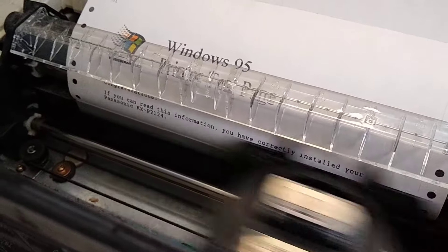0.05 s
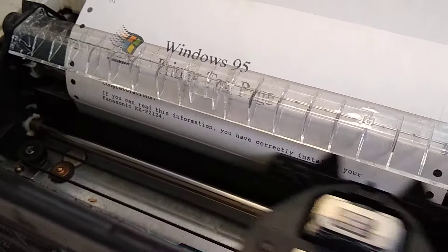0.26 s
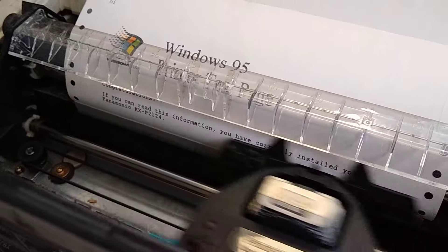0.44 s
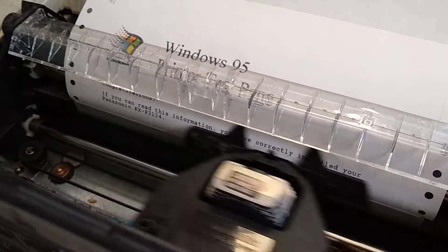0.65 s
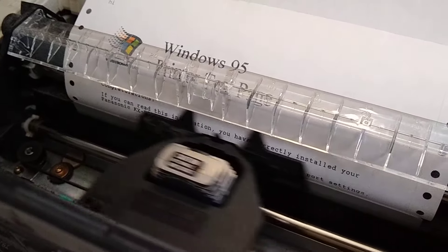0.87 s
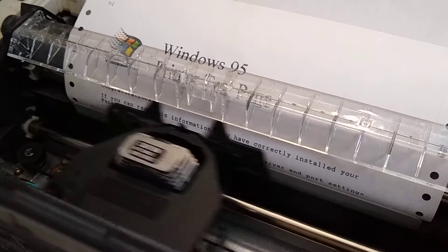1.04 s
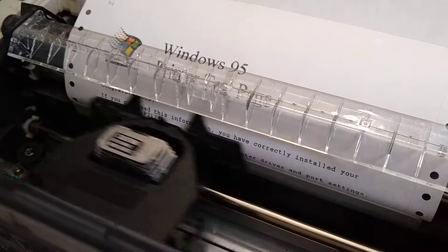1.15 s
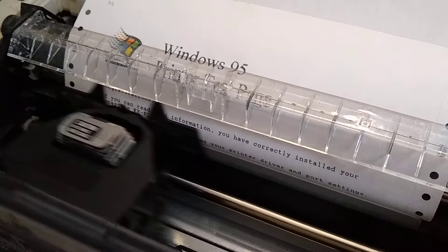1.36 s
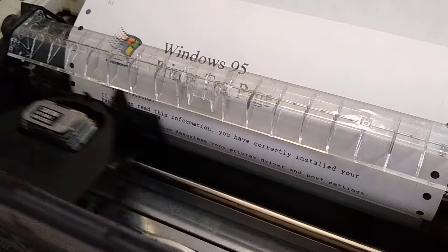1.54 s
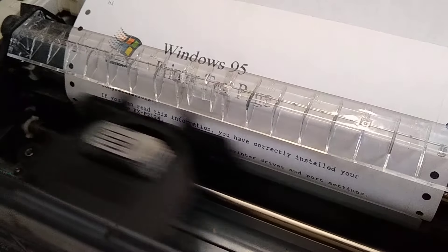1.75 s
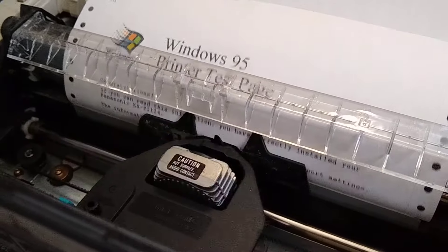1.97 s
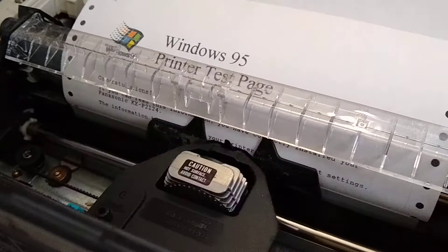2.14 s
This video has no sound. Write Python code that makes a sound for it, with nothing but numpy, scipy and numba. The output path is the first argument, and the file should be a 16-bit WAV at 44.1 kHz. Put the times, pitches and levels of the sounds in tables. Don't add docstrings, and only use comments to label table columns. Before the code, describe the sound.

Dot matrix printer head buzzing raspily across one line, carriage whirring and clacking, close up indoors.

```python
import sys
import numpy as np
from scipy import signal
from scipy.fft import rfft, irfft
from scipy.io import wavfile
from scipy.ndimage import uniform_filter1d
from numba import njit

SR = 44100
rng = np.random.default_rng(int(sys.argv[2]) if len(sys.argv) > 2 else 0)


def transcribe(signal):
    frames = np.atleast_2d(signal).T
    limited = np.clip(frames, -1, 1)
    pcm = np.round(limited * 32767).astype(np.int16)
    wavfile.write(sys.argv[1], SR, pcm)


def decibels_to_gain(level_db):
    exponent = np.asarray(level_db, float) / 20
    return 10 ** exponent


N = 97020
T = np.arange(N) / SR
FREQ = np.fft.rfftfreq(2 ** 17, 1 / SR)


def unit(x):
    return x / np.sqrt(np.mean(x ** 2))


def curve(table, col=1):
    table = np.array(table)
    return np.interp(T, table[:, 0], table[:, col])


def over_hz(table, f=FREQ):
    table = np.array(table)
    return np.interp(np.log(f + 1), np.log(table[:, 0]), table[:, 1])


def through(x, response):
    size = 2 * (len(FREQ) - 1)
    return irfft(rfft(x, size) * response, size)[:N]


def colour(table):
    cepstrum = irfft(np.log(decibels_to_gain(over_hz(table))))
    half = len(cepstrum) // 2
    cepstrum[1:half] *= 2
    cepstrum[half + 1:] = 0
    return np.exp(rfft(cepstrum))


def coloured_noise(response):
    return unit(through(rng.standard_normal(N), response))


def peak(hz, width):
    return 1 / (1 + 1j * (FREQ - hz ** 2 / (FREQ + 1)) / width)


def low_cut(hz):
    return 1 / (1 - 1j * hz / (FREQ + 1)) ** 2


@njit
def svf(x, hz, width):
    y, band, low = np.empty(len(x)), 0., 0.
    for i in range(len(x)):
        g, k = np.tan(np.pi * hz[i] / SR), width / hz[i]
        v = (band + g * (x[i] - low)) / (1 + g * (g + k))
        band, low, y[i] = 2 * v - band, low + 2 * g * v, k * v
    return y


def walk(rate):
    k = int(SR / rate)
    held = np.repeat(rng.standard_normal(N // k + 1), k)
    return 1.58 * uniform_filter1d(uniform_filter1d(held, k), k)[:N]


def gate(start, length, edge):
    return np.clip((T - start) / edge, 0, 1) * np.clip((start + length - T) / edge, 0, 1)


# (frequency [Hz], density [dB/Hz])
ROOM_SPECTRUM = [(24, -47), (40, -17), (164, 8), (866, 1), (1260, -22), (2710, -8), (15000, -13)]


def room():
    return [coloured_noise(colour(ROOM_SPECTRUM)) * decibels_to_gain(-75) for _ in range(2)]


# (time [s], level [dB])
RUMBLE_LEVEL = [(.35, -69), (.9, -55.5), (1.2, -62.5), (1.5, -50.5), (1.72, -49), (1.78, -85)]
POWER_ON_S = .055


def rumble():
    drone = coloured_noise(peak(230, 66) ** 2) * decibels_to_gain(-57) * gate(0.43, 1.54, .05)
    low = coloured_noise(peak(141.3, 17) ** 2) * decibels_to_gain(curve(RUMBLE_LEVEL))
    return drone + low * (T > POWER_ON_S)


# (multiple of the motor rate [-], level [dB])
FEED_TONES = [(1, -51.5), (2, -56.5), (3, -56), (5, -61)]
# (frequency [Hz], density [dB/Hz])
FRICTION_SPECTRUM = [(200, -11.5), (700, -8.5), (2500, -0.5), (5000, -8.5), (7000, -16.5), (11000, -13.5),
                     (16000, -23)]
FEED_S, FEED_LENGTH_S, FEED_HZ = 2.04, 0.16, 405


def feed():
    hum = 0
    for k, db in FEED_TONES:
        hum = hum + decibels_to_gain(db + 3.3 * walk(28.68)) * np.sin(2 * np.pi * k * FEED_HZ * T)
    rustle = coloured_noise(colour(FRICTION_SPECTRUM)) * decibels_to_gain(-44 + 2.3 * walk(40.05))
    hum = 1.5 * hum * gate(FEED_S + 0.04, FEED_LENGTH_S - .05, 0.015)
    return hum + rustle * gate(FEED_S, FEED_LENGTH_S, .025)


# (time [s], frequency [Hz], level [dB], decay time T60 [s])
SHUDDERS = [
    (0.067, 297, -44.5, 0.29),
    (0.065, 1840, -43, .06),
    (0.322, 272, -46, 0.13),
    (1.778, 296, -36.5, 0.24),
    (2.036, 249, -44, 0.23),
    (2.179, 240, -44.5, 0.15),
]
# (time [s], frequency [Hz], level [dB], decay time T60 [s])
RINGS = [(.353, 1090, -37, .045), (.36, 1200, -37, .04), (.392, 2600, -33, .035), (.396, 2480, -35, .03),
         (.404, 2620, -34, .03), (.408, 2400, -34, .03), (1.737, 1120, -41, .05), (1.75, 780, -41, .06),
         (1.77, 620, -36, .04), (1.7995, 4060, -20, .02), (1.7995, 2100, -32, .025),
         (1.905, 2150, -24, .018), (1.905, 3300, -27, .018), (2.025, 1100, -45, .06),
         (2.137, 1150, -35, .03), (2.137, 2080, -37, .03)]
# (time [s], level [dB], centre frequency [Hz], bandwidth [Hz])
KNOCKS = [(.057, -37, 1100, 1500), (.312, -25, 1500, 1600), (1.745, -30, 700, 900), (1.77, -30, 1200, 2500),
          (1.779, -25, 3000, 5000), (.238, -26, 3500, 4000), (1.8, -22, 5000, 5000),
          (1.865, -23, 3000, 3000), (1.892, -24, 4800, 1500), (1.906, -21, 4500, 3000),
          (2.137, -26, 1800, 3000), (2.179, -32, 4000, 4000)]
MODE_RISE_S, KNOCK_T60_S, KNOCK_TICK = .001, .018, 1.2


def jolts():
    out = np.zeros(N)
    for s, hz, db, t60 in [*SHUDDERS, *RINGS]:
        t = np.clip(T - s, 0, None)
        envelope = decibels_to_gain(db - 60 * t / t60) * 2 * (1 - np.exp(-t / MODE_RISE_S))
        out += envelope * np.sin(2 * np.pi * hz * t)
    for s, db, hz, width in KNOCKS:
        envelope = (T >= s) * decibels_to_gain(db - 60 * np.abs(T - s) / KNOCK_T60_S)
        burst = envelope * (rng.standard_normal(N) + KNOCK_TICK * (T < s + .0001))
        out += 2 * svf(burst, np.full(N, 1. * hz), 1. * width)
    return out


# (time [s], duration [s], level [dB])
SQUEALS = [
    (1.66, .06, -50),
    (1.715, .065, -44),
    (2.0, .045, -46),
    (.36, .05, -54),
]
SQUEAL_HZ, SQUEAL_WIDTH_HZ = 4220, 240.


def squeal():
    hz = SQUEAL_HZ * (1 + .025 * walk(66))
    tone = svf(svf(rng.standard_normal(N), hz, SQUEAL_WIDTH_HZ), hz, SQUEAL_WIDTH_HZ)
    return unit(tone) * sum(decibels_to_gain(db) * gate(s, length, 0.0084) for s, length, db in SQUEALS)


# (time [s], duration [s], level [dB])
WHINES = [
    (0.036, 0.021, -50.5),
]
# (multiple of the whine frequency [-], level [dB])
WHINE_TONES = [(1, -26), (2, -14), (3, 0), (4, -20), (5, -10), (6, -14), (7, -12), (8, -20)]
WHINE_HZ = 1443


def whine():
    wobble = walk(100)
    tone = 0.24 * rng.standard_normal(N)
    for k, db in WHINE_TONES:
        tone = tone + decibels_to_gain(db) * np.sin(2 * np.pi * k * WHINE_HZ * T + k * k + 0.22 * k * wobble)
    return tone * sum(decibels_to_gain(db) * gate(s, length, 0.0011) for s, length, db in WHINES)


# (time [s], speed as a share of printing speed [-])
SPEED = [(.055, 0), (.06, .75), (.092, 1.5), (.292, 1.5), (.328, .3), (.338, .1), (.345, .6), (.372, 1),
         (1.732, 1), (1.76, .35), (1.768, .35), (1.776, 1.15), (1.8, 1.5), (2.015, 1.5), (2.043, .3),
         (2.056, 0)]
# (multiple of the step rate [-], level printing [dB], level dashing [dB])
MOTOR = [(1, -53, -66), (2, -59, -62), (3, -70, -70), (4, -45, -66), (5, -68, -53), (6, -59, -64),
         (7, -68, -46), (8, -66, -53), (10, -66, -56), (12, -56, -57)]
# (time [s], gain [dB])
STEP_HUM = [(0, 1.5), (.62, 0.5), (.7, -4.5), (1.4, -7), (1.6, -3.5), (2.2, 0)]
# (multiple of the belt rate [-], level dashing [dB])
BELT = [(1, -59), (2, -58), (3, -57)]
# (frequency [Hz], density [dB/Hz])
RAIL_SPECTRUM = [(200, -20), (330, -8.5), (460, -24.5), (1500, -16.5), (2600, 5), (7000, -2), (12000, 1.5),
                 (16000, -14.5)]
STEP_HZ, BELT_HZ = 337.7, 241.5
GLIDE_LOSS_DB = 1.3
RAIL_DB, RAIL_POWER, RAIL_GRAIN_DB = -25.5, 2.17, 2.5


def carriage():
    v = curve(SPEED)
    turn = 2 * np.pi * np.cumsum(v) / SR
    dash, moving = np.clip(2 * v - 2, 0, 1), np.clip(2.3 * v, 0, 1)
    gliding = np.clip(uniform_filter1d(np.abs(np.gradient(v)) * SR / 15, size=400), 0, 1)
    tones = np.zeros(N)
    for k, slow_db, fast_db in MOTOR:
        db = slow_db + (fast_db - slow_db) * dash + (k == 1) * curve(STEP_HUM)
        db = db + 0.36 * walk(24.6) - GLIDE_LOSS_DB * k * gliding
        tones += decibels_to_gain(db) * np.sin(k * STEP_HZ * turn + k * k)
    for k, db in BELT:
        tones += decibels_to_gain(db + 1.9 * walk(14.4)) * dash * np.sin(k * BELT_HZ * turn)
    roughness = 6.3 * uniform_filter1d(rng.standard_normal(N), size=40)
    grains = rng.standard_normal(N) * decibels_to_gain(RAIL_GRAIN_DB * roughness)
    hiss = unit(through(grains, colour(RAIL_SPECTRUM))) * decibels_to_gain(RAIL_DB + .5 * walk(44.14))
    hiss = hiss * (v / 1.675) ** RAIL_POWER
    slide = coloured_noise(colour(FRICTION_SPECTRUM)) * decibels_to_gain(-38.5 + 2 * walk(50.0))
    return (1.8 * tones + slide) * moving + hiss


WORDS = [(0, 9), (10, 4), (15, 3), (19, 6), (26, 7), (34, 4), (39, 9), (49, 5), (55, 11), (67, 3)]
INK = [(0, .05), (.2, .12), (.3, .32), (.45, .25), (.62, .3), (.8, .18), (1, .08)]
# (time [s], strength [dB])
STROKES = [(0.4214, -60), (0.4387, -2.5), (0.5101, -47), (0.5282, -0.5), (0.6007, -28), (0.626, -14),
           (0.6516, -8), (0.6797, 8), (0.7232, -4), (0.7585, -69), (0.774, -42), (0.8806, -13),
           (0.9182, -3.5), (0.974, -7.5), (0.992, -11), (1.0236, -1.5), (1.1078, -5.5), (1.2848, -7.5),
           (1.3236, -5), (1.3915, -4), (1.4575, -9.5), (1.5417, -20), (1.611, -37)]
LETTER_HZ, LINE_START_S, COLUMNS, PINS = 56.262, .4148, 36, 24
DOT = (.25, .7)
STROKE_DB, STROKE_S = -5.5, 0.00114
LETTER_SCATTER_DB, COLUMN_SCATTER_DB, PIN_SCATTER_DB = .7, 2.8, 2.5
PIN_JITTER_S, ROW_LAG = .000032, .46
REBOUND_S, REBOUND_JITTER_S, REBOUND_DB = .0011, 0.0003063, 1.5
FLEX_SCATTER = .4
FLEX_FROM, FLEX_TOP = .14, .4


def impulses(times, sizes):
    fine = 8
    train = np.bincount((times * SR * fine).astype(int), sizes, N * fine)
    return signal.resample_poly(train, 1, fine)


def strikes():
    letters = np.concatenate([np.arange(first, first + n) for first, n in WORDS])
    place = np.arange(COLUMNS) / COLUMNS
    when = (LINE_START_S + (letters[:, None] + place) / LETTER_HZ).ravel()
    letter_gain = decibels_to_gain(LETTER_SCATTER_DB * rng.standard_normal((len(letters), 1)))
    share = np.interp(place, *np.array(INK).T) * letter_gain
    share[0] *= (place > DOT[0]) & (place < DOT[1])
    even = share.ravel()
    share = even * decibels_to_gain(COLUMN_SCATTER_DB * rng.standard_normal(len(when)))
    for s, db in STROKES:
        share = share + decibels_to_gain(db + STROKE_DB) * np.exp(-((when - s - STROKE_S) / STROKE_S) ** 2)
    size = np.clip((share[:, None] - rng.random((len(when), PINS))) * 20, 0, 1)
    z = rng.standard_normal((4, len(when), PINS))
    row_lag = np.arange(PINS) % 2 * ROW_LAG / (LETTER_HZ * COLUMNS)
    hit = when[:, None] + row_lag + PIN_JITTER_S * z[0]
    rebound = hit + REBOUND_S + REBOUND_JITTER_S * z[1]
    hit_size = size * decibels_to_gain(PIN_SCATTER_DB * z[2])
    rebound_size = -size * decibels_to_gain(REBOUND_DB + PIN_SCATTER_DB * z[3])
    times = np.concatenate([hit, rebound]).ravel()
    sizes = np.concatenate([hit_size, rebound_size]).ravel()
    push = np.clip(even + FLEX_SCATTER * (share - even) - FLEX_FROM, 0, FLEX_TOP)
    return impulses(times, sizes), impulses(when, push)


# (time [s], level [dB], ring centre [Hz], ring level [dB], platen flex level [dB])
HEAD = [(.42, -12, 9830, 10, -5), (.7, -11, 9840, 12.5, -12), (.95, -10, 9810, 10, -6),
        (1.2, -10, 10160, 6.5, -5.5), (1.45, -10.5, 10240, 2, -4), (1.66, -10.5, 10100, 3, -8)]
# (frequency [Hz], density [dB/Hz])
PLATEN_SPECTRUM = [(500, -30), (900, -5.5), (1800, -5.5), (2300, 3), (4500, 1.5), (6800, -3.5),
                   (12000, 3.5), (16000, -10.5)]
# (frequency [Hz], bandwidth [Hz], level [dB])
CASE_MODES = [(1108, 50, -9), (1537, 93, -6.5), (2230, 106, 0), (3071, 56, 12), (3800, 27, 6.5),
              (4049.7, 314, 8.5), (4824, 58, 2), (5030, 37, 10), (5854, 140, -3.5), (7020, 23, 3),
              (7460, 58, -4)]
RING_WIDTH_HZ = 1180.


def head():
    pins, push = strikes()
    flex = unit(through(push, peak(4060, 330) ** 2)) * decibels_to_gain(curve(HEAD, col=4))
    pins = through(pins, low_cut(870))
    response = colour(PLATEN_SPECTRUM)
    for k, (hz, width, db) in enumerate(CASE_MODES):
        response = response + (-1) ** k * decibels_to_gain(db) * peak(hz, width) * peak(hz, 4 * hz)
    body = through(pins, response)
    ring_hz = curve(HEAD, col=2)
    ring = svf(svf(pins, ring_hz, RING_WIDTH_HZ), ring_hz, 2 * RING_WIDTH_HZ)
    ring = ring * decibels_to_gain(curve(HEAD, col=3))
    return (unit(body + ring) + flex) * decibels_to_gain(curve(HEAD) - 4.5)


SHIFT_S = .045


def scatter(x, t60):
    hop = int(SHIFT_S * SR)
    out = np.zeros(N + SR)
    fade = decibels_to_gain(-60 * T[:SR // 10] / t60)
    window = np.sin(np.pi * np.arange(2 * hop) / (2 * hop))
    padded = np.pad(x, (hop, 2 * hop))
    for i in range(0, N + hop, hop):
        echoes = rng.standard_normal(SR // 10) * fade
        echoes = echoes / np.sqrt(np.sum(echoes ** 2))
        y = signal.fftconvolve(padded[i:i + 2 * hop] * window, echoes)
        out[i:i + len(y)] += y
    return out[hop:hop + N]


# (frequency [Hz], left minus right [dB])
LEFT_LEVEL = [(200, -3), (1300, -2.5), (2600, -18.5), (4300, -9), (5600, -12), (7800, -2), (9900, -22),
              (12000, -11.5)]
# (frequency [Hz], share of the left sound that comes straight [-])
LEFT_STRAIGHT = [(100, .75), (600, .9), (1500, .75), (2200, .3), (4000, .3), (5000, .05)]
ECHO_DB, ECHO_T60_S, ECHO_LOW_HZ = -12, .09, 1700
SCATTER_T60_S, LEFT_LAG_S = .2, 0.0002


def scene():
    x = rumble() + feed() + jolts() + squeal() + whine() + carriage() + head()
    right = x + decibels_to_gain(ECHO_DB) * through(scatter(x, ECHO_T60_S), low_cut(ECHO_LOW_HZ))
    straight = np.clip(over_hz(LEFT_STRAIGHT), 0, 1)
    late = np.exp(-2j * np.pi * FREQ * LEFT_LAG_S) * decibels_to_gain(over_hz(LEFT_LEVEL))
    scattered = through(scatter(x, SCATTER_T60_S), late * np.sqrt(1 - straight ** 2))
    left = scattered + through(right, late * straight)
    return np.array([left, right]) + room()


def band_limit(x):
    return signal.sosfilt(signal.butter(12, 16790, fs=SR, output="sos"), x)


def record(dry):
    clip = .9
    rounded = np.tanh(dry / clip) * clip
    low = signal.butter(2, 70, "high", fs=SR, output="sos")
    top = signal.ellip(10, .2, 70, 15750, fs=SR, output="sos")
    mix = signal.sosfilt(top, signal.sosfilt(low, rounded))
    return band_limit(mix)


dry = scene()
out = record(dry)
transcribe(out)
```